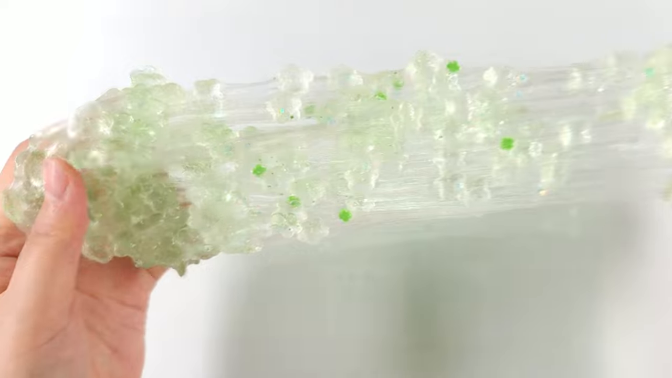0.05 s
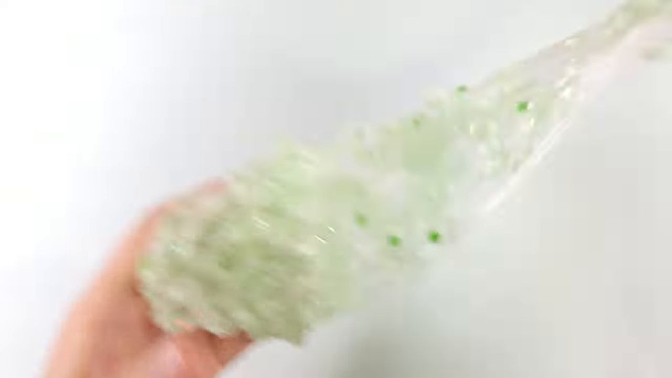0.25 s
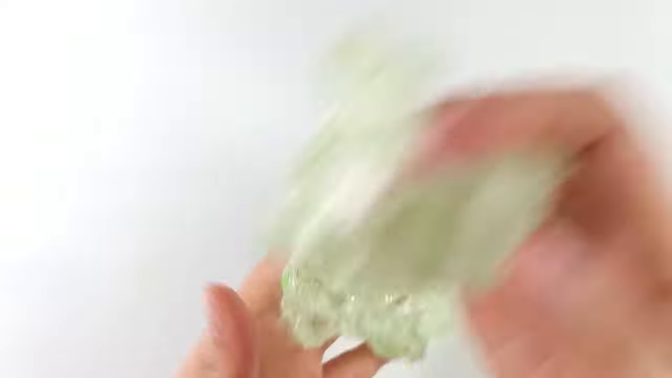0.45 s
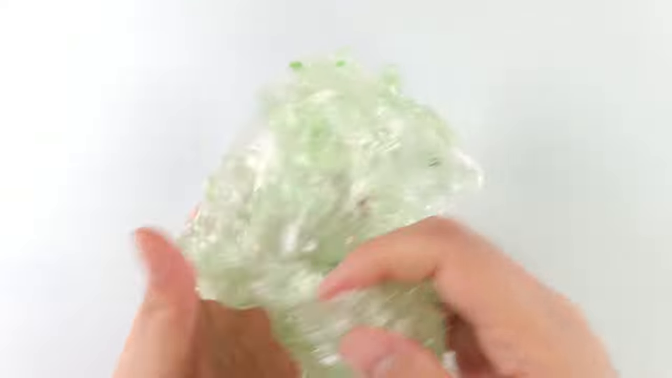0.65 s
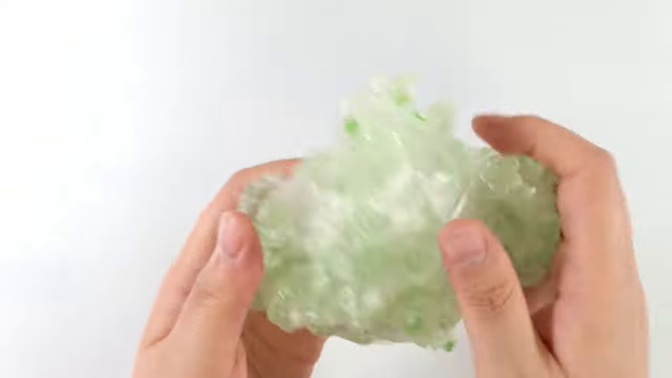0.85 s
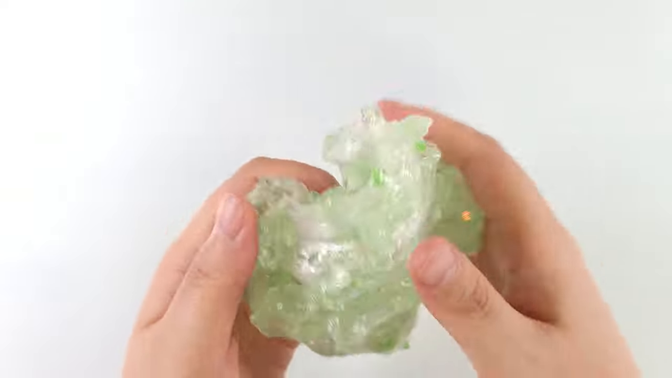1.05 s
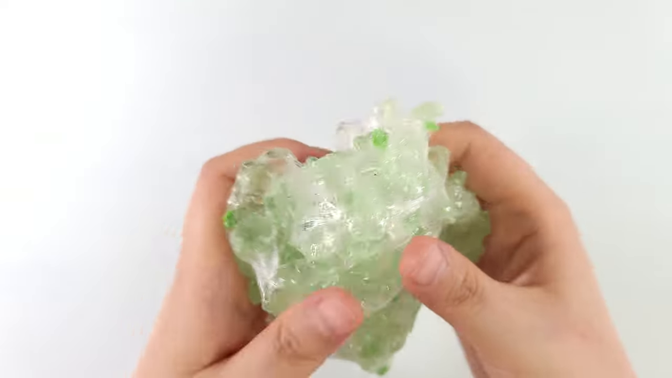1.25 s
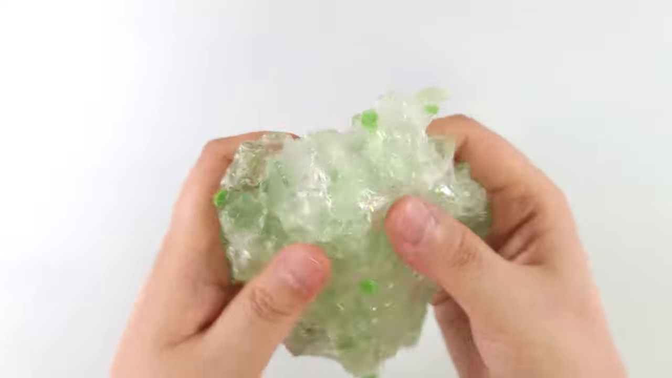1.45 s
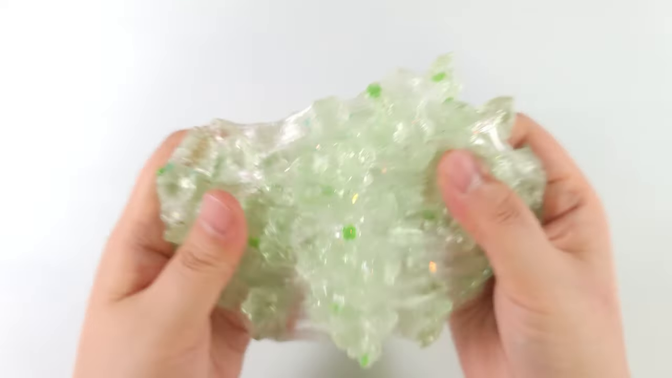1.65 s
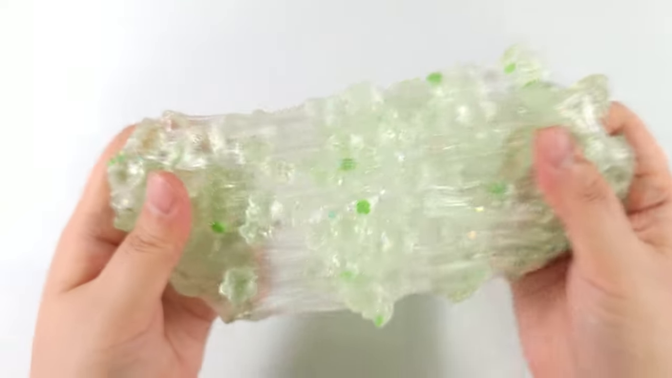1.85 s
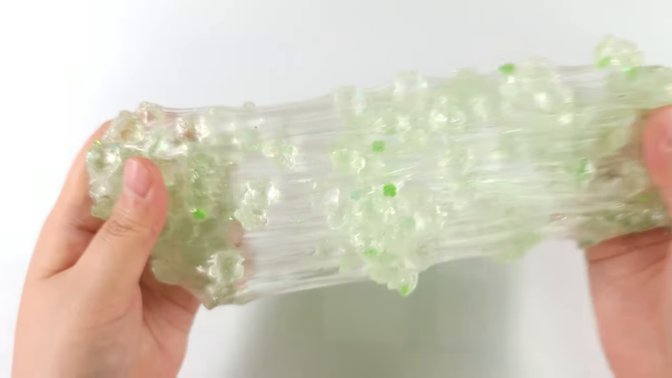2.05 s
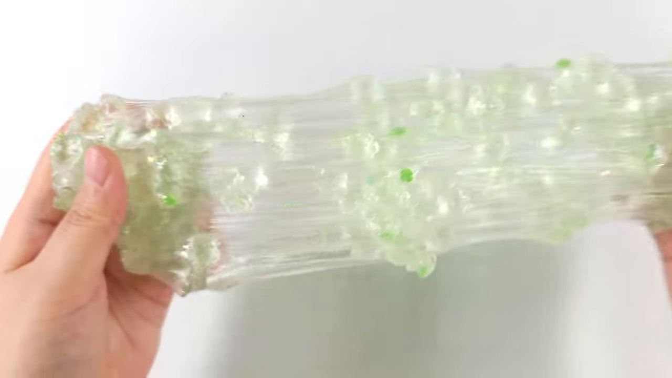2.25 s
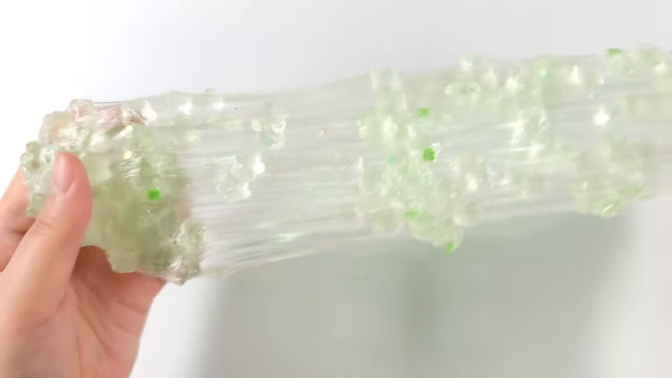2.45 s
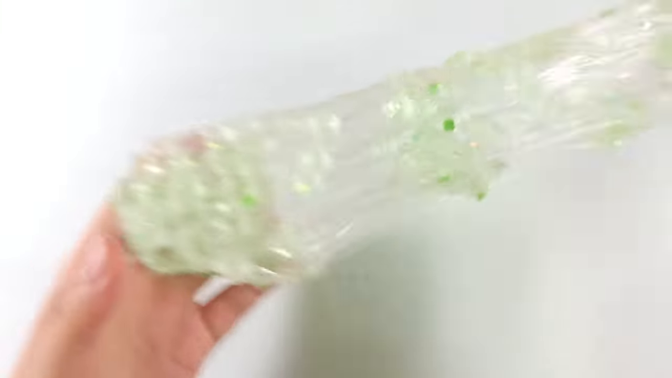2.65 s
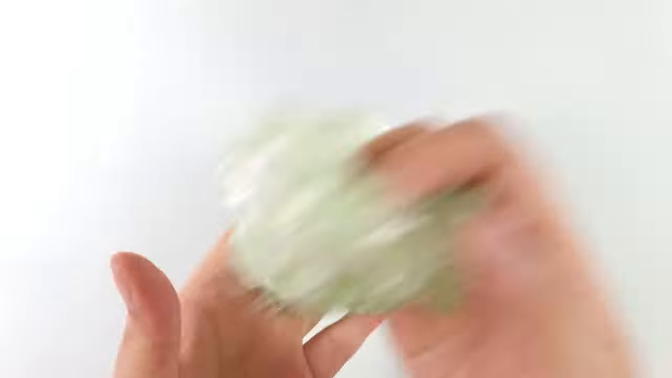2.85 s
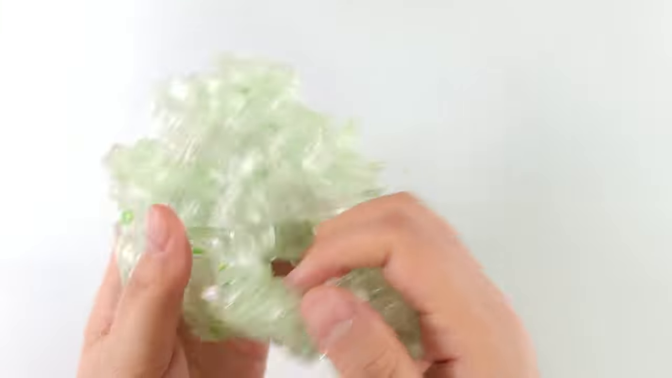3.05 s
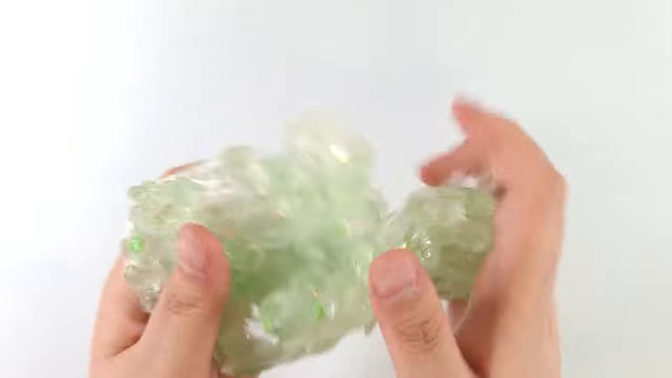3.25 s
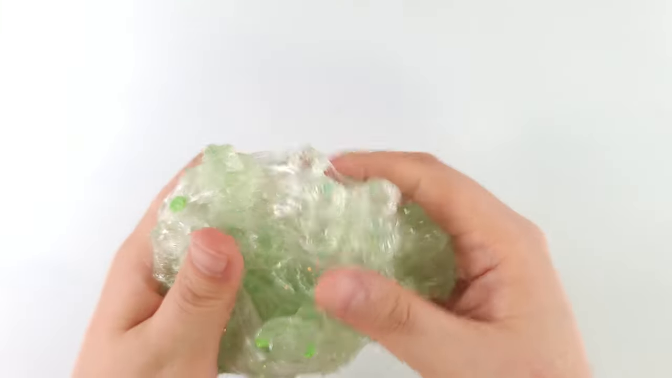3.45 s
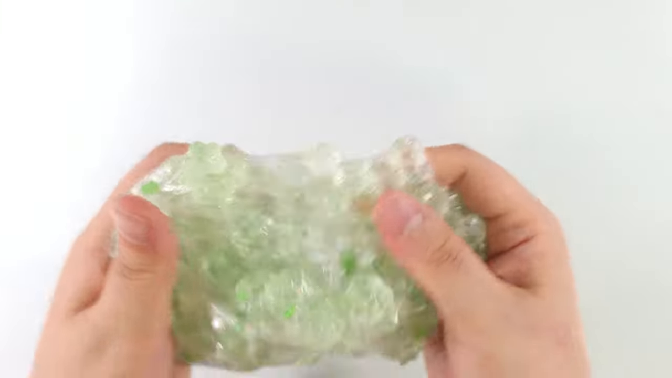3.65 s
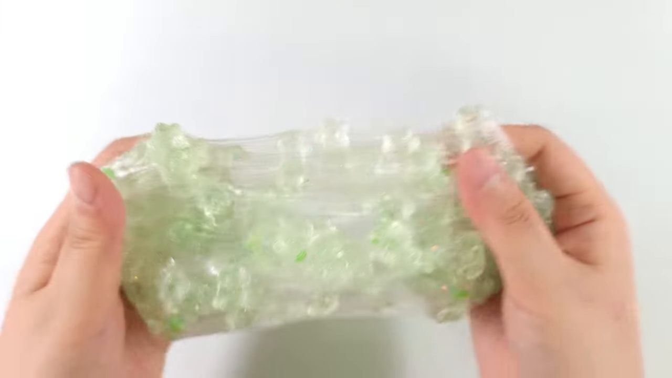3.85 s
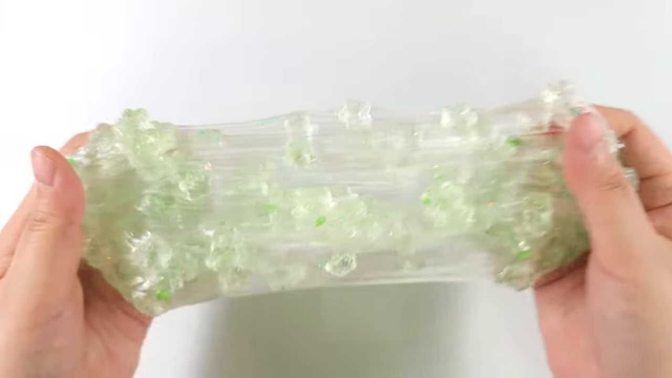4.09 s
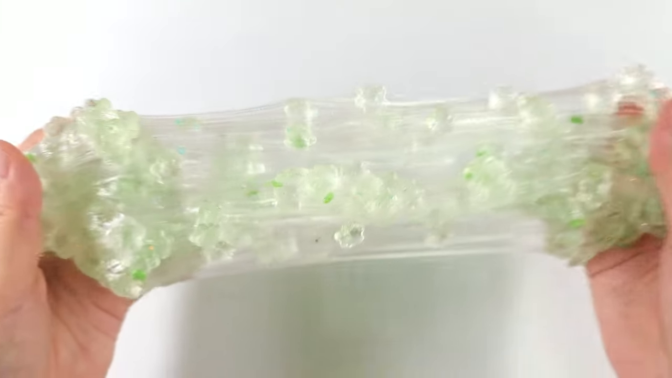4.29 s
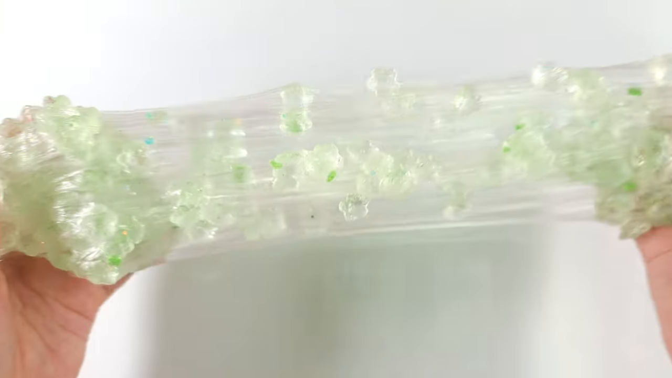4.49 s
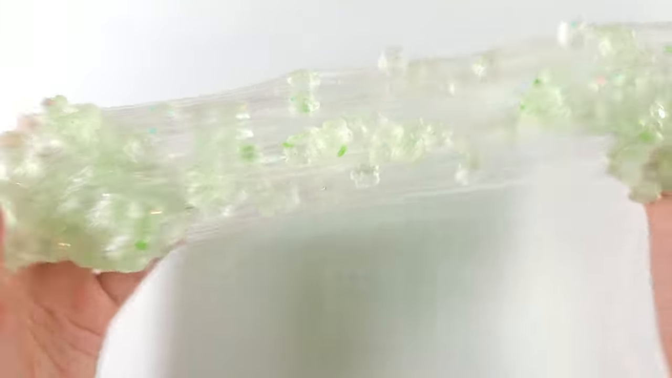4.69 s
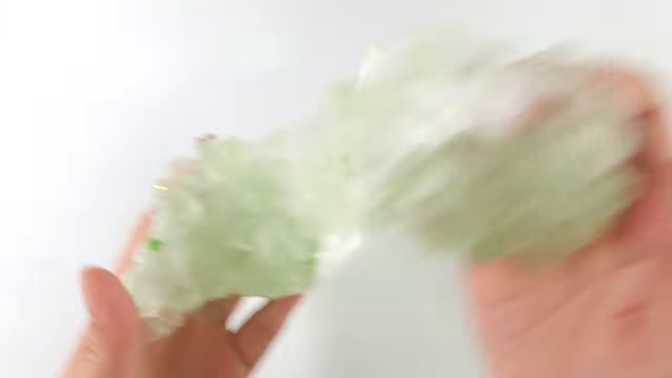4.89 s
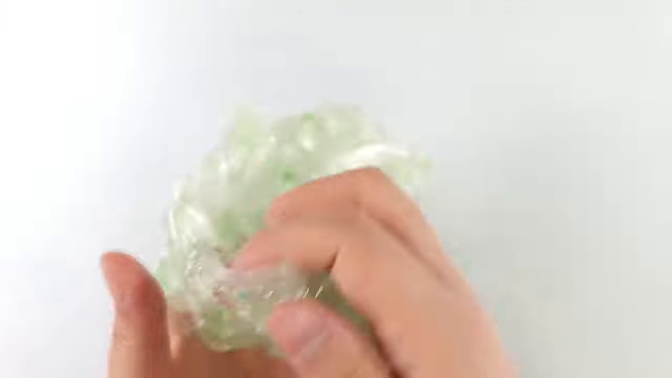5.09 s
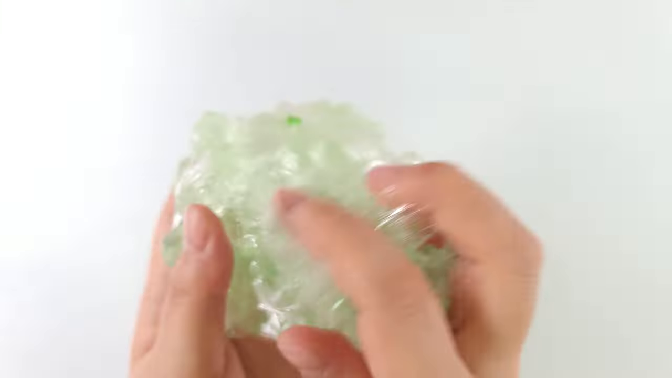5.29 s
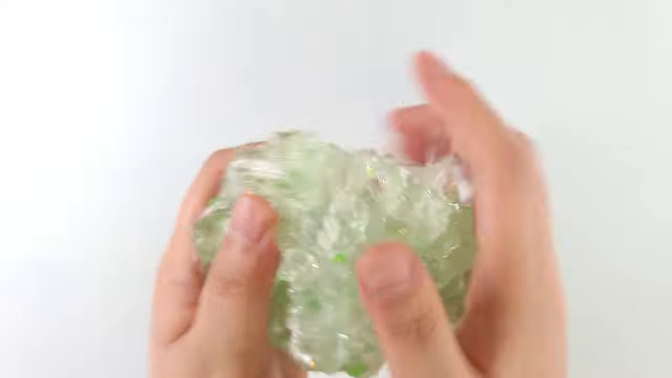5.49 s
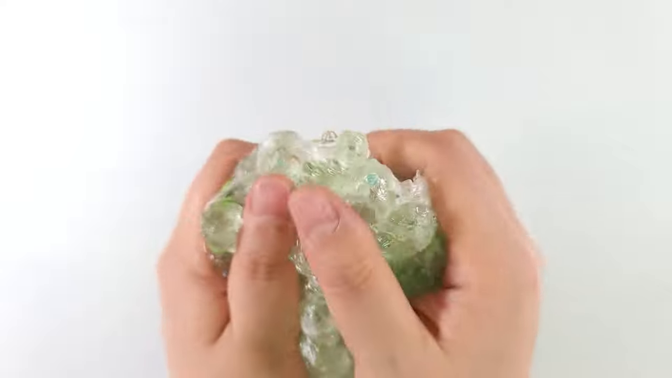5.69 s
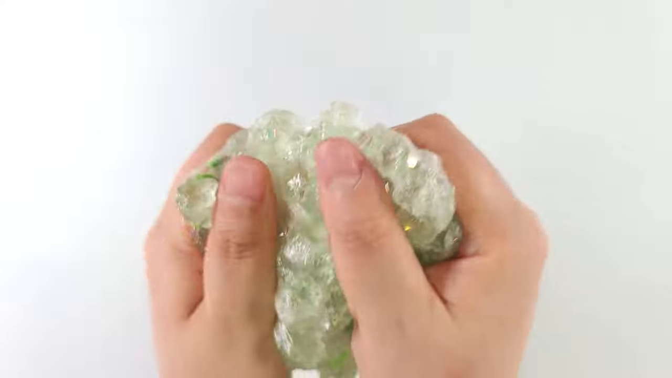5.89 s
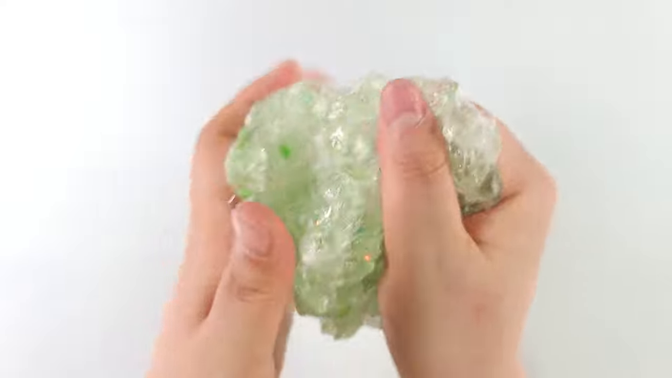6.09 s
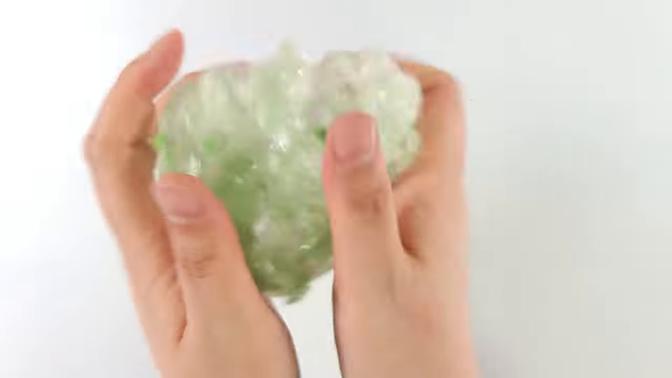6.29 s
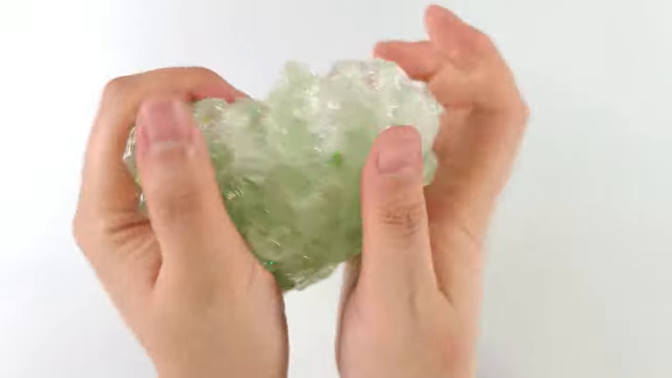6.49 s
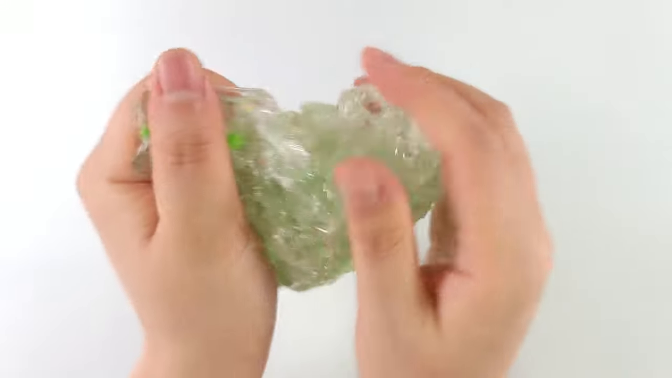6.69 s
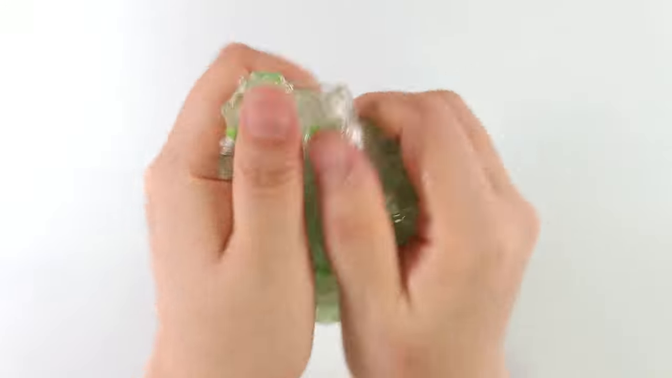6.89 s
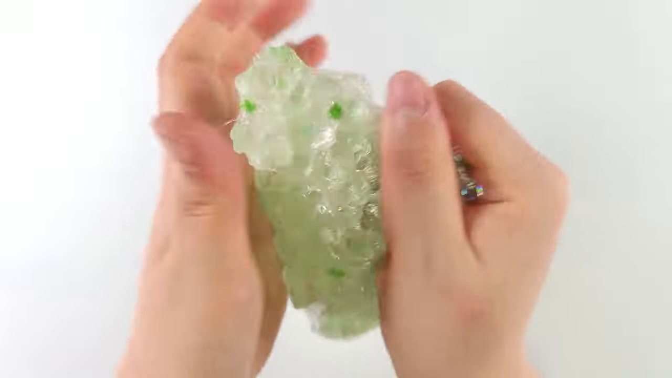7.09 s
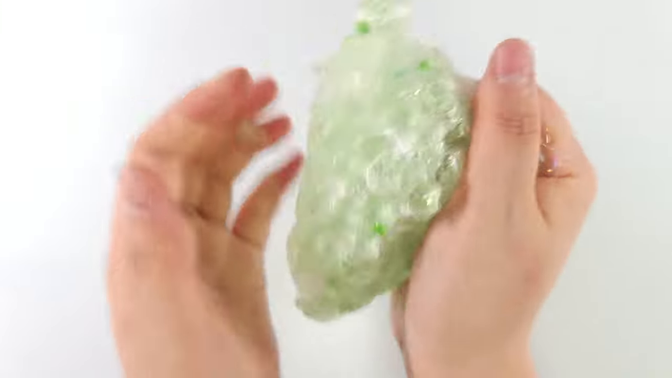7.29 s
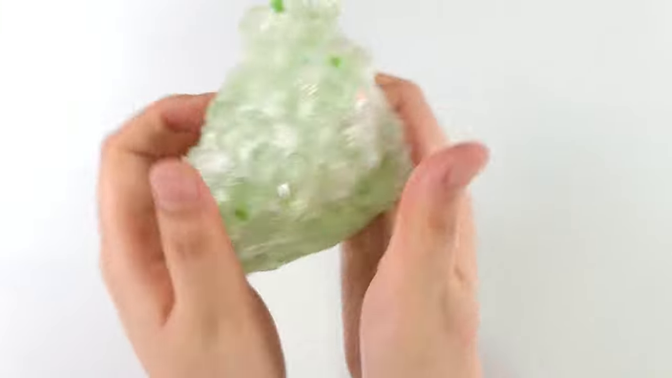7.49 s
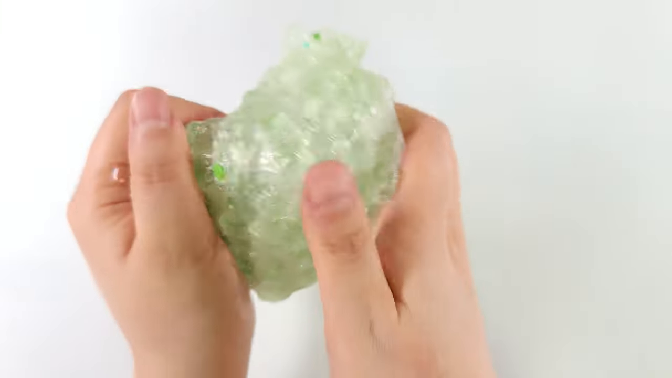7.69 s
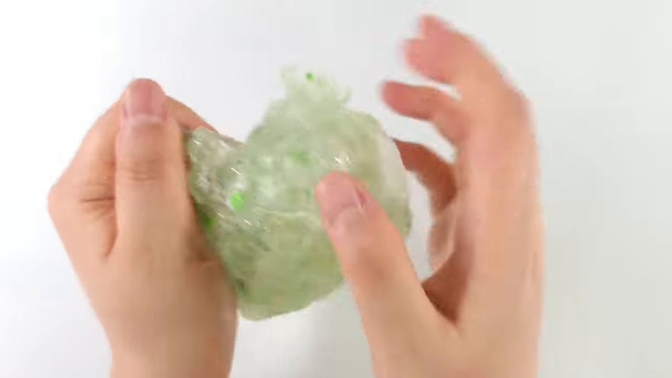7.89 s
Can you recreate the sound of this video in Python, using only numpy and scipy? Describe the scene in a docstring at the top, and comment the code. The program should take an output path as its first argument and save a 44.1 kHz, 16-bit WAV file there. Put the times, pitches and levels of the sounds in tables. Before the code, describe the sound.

Mono close-up of slime full of tiny air pockets being kneaded. Irregular crackles, bright fizz and soft squelch swell and let go with each pull, with scattered small pops. After a sparse, faint stretch and a tiny squirt, a hard squeeze sets off the loudest popping, followed by another snapping cluster near seven seconds. Dull palm rubbing and faint room rumble lie underneath.

```python
"""Hands kneading bubbly slime

Two hands stretch, fold and squeeze a lump of slime close to a mono microphone in a small quiet room.
Each stroke swells, thins out and lets go: random clicks drive resonators that crackle, fizz and squelch.
Popping air pockets and one squirt are short swelling tones with noise; low rising blips are mostly
big pockets collapsing, and one is a hand bump. Filtered noise makes the dull rub of palms and the
room's rumble; a limiter holds the loudest pops."""
import sys
import numpy as np
from scipy import signal
from scipy.fft import rfft, irfft
from scipy.io import wavfile
from scipy.ndimage import uniform_filter1d, minimum_filter1d

SR = 44100
rng = np.random.default_rng(int(sys.argv[2]) if len(sys.argv) > 2 else 0)


def master(y):
    """Save y as 16-bit WAV."""
    cut = np.clip(np.atleast_2d(y).T, -1, 1)
    pcm = np.round(cut * 32767)  # scale
    wavfile.write(sys.argv[1], SR, pcm.astype(np.int16))


N = 350154


def from_db(db):
    """Decibels to gain."""
    return 10 ** (np.asarray(db) / 20)


def rms_one(x):
    """Scale to unit power."""
    return x / np.sqrt(np.mean(x ** 2) + 1e-20)


def at_hz(points, hz):
    """Read a spectrum in dB on a log-frequency axis."""
    points = np.array(points)
    return np.interp(np.log(hz), np.log(points[:, 0]), points[:, 1])


def band(x, low_hz, high_hz, order=2):
    """Causal band-pass."""
    sos = signal.butter(order, [low_hz, high_hz], "band", fs=SR, output="sos")
    return signal.sosfilt(sos, x)


def drift(per_s):
    """Smooth chance with spread 1: random values, so many a second, joined by straight lines."""
    knots = rng.standard_normal(N // 10)
    return rms_one(np.interp(np.arange(N) * per_s / SR, np.arange(len(knots)), knots))


def add(out, s, sound):
    """Mix a sound in at a time in seconds."""
    at = int(np.clip(round(s * SR), 0, N - 1))
    out[at:at + len(sound)] += sound[:N - at]


def working():
    """Drive of crackle, fizz and squelch in dB: strokes swell, sag and let go by one rule and add in power."""
    # Each grip, press or pull of the hands. Each row: time of full force in seconds, swell in seconds,
    # hold in seconds, crackle in dB, fizz over crackle in dB, squelch over crackle in dB (before the trims).
    strokes = [(0.274, 0.12, 0.06, -37.5, -3.5, -15), (0.951, 0.22, 0.049, -47, -2, -16.5),
               (1.083, 0.07, 0.045, -35, 0.5, -21.5), (1.308, 0.046, 0.068, -36, -4.5, -19.5),
               (1.56, 0.018, 0.13, -33, -6, -19.5), (1.751, 0.13, 0.62, -37, -2, -11.5),
               (2.507, 0.007, 0.075, -36.5, -7.5, -13), (2.645, 0.1, 0.6, -51.5, -3, -15),
               (3.083, 0.026, 0.054, -46, -7, -22), (3.287, 0.088, 0.21, -37, -1.5, -15),
               (3.563, 0.0097, 0.0043, -37, -3, -9.5), (3.739, 0.17, 0.25, -36.5, -2, -12.5),
               (4.122, 0.45, 0.08, -43, -3, -7), (4.335, 0.12, 0.016, -53.5, 1.5, -5),
               (4.572, 0.19, 0.0082, -45, 0, -7), (4.861, 0.021, 0.07, -53.5, -6, -32),
               (4.963, 0.11, 0.037, -48.5, -0.5, -18.5), (5.28, 0.11, 0.034, -41, -6, -26),
               (5.408, 0.087, 0.12, -36, -13, -15.5), (5.542, 0.19, 0.033, -29.5, -0.5, -15),
               (5.904, 0.25, .32, -25, -1.5, -11.5), (6.386, 0.11, 0.053, -34, -0.5, -12),
               (6.682, 0.39, 0.2, -35, -2.5, -13), (7.066, 0.082, 0.26, -28, -0.5, -11.5),
               (7.333, .01, 0.0059, -35.5, 9, -7), (7.507, 0.044, 0.34, -37, 0.5, -12),
               (7.783, 0.16, .05, -29.5, -4, -13.5), (7.872, 0.045, .06, -27, -8, -8)]
    # The lump settling between strokes: crackle, fizz and squelch in dB (before the trims).
    rest_db = (-65.5, -64, -90)
    # A held stroke thins out as its cells are used up, and dies when the fingers let go.
    swell_db, sag_db_per_s, release_db_per_s = 20.5, 27.5, 218
    squelch_follows = 0.88   # share of a stroke's swing in dB that the squelch takes part in

    t = np.arange(N) / SR
    power = np.outer(from_db(rest_db) ** 2, np.ones(N))
    for s, swell_s, hold_s, level_db, fizz_db, squelch_db in strokes:
        near = (t > s - 2 * swell_s) & (t < s + hold_s + .25)
        age = t[near] - s
        swell = swell_db * np.minimum(age, 0) / swell_s
        sag = sag_db_per_s * np.clip(age, 0, hold_s)
        release = release_db_per_s * np.maximum(age - hold_s, 0)
        force_db = swell - sag - release
        layers_db = np.array([force_db, fizz_db + force_db, squelch_db + squelch_follows * force_db])
        power[:, near] += from_db(level_db + layers_db) ** 2
    return 10 * np.log10(power)


def tears(per_s, spread_db, clump_db):
    """Cells give way at random and in clumps; most are tiny, a few are large."""
    born = rng.random(N) < per_s * from_db(clump_db * drift(45)) / SR
    size = from_db(spread_db * np.minimum(rng.exponential(1, N), 6.2))
    return rms_one(born * size * rng.choice([-1, 1], N))


def ring(x, hz, cycles):
    """A resonance that loses 60 dB in so many cycles; each click leaves the same energy at any pitch."""
    r = from_db(-60 * hz / (cycles * SR))   # decay per sample
    w = 2 * np.pi * hz / SR
    return signal.lfilter(np.sqrt(1 - r * r) * np.array([1, 0, -1]), [1, -2 * r * np.cos(w), r * r], x + 1e-18)


def steady(x):
    """Unit power, evened out over some hundredths of a second."""
    x = rms_one(x)
    power = uniform_filter1d(uniform_filter1d(x ** 2, size=2600), size=1600)
    return x / np.sqrt(np.abs(power) + 1e-3)


def cells(clicks, spectrum, cycles, spill_db, wander_db=5.0, count=16):
    """Each tear rings its own cell and jolts all others; the favoured size wanders as the fingers move on."""
    dealt = rng.integers(0, count, N)   # which cell each click belongs to
    size = 2 * drift(14)
    rings = 0
    for k, hz in enumerate(np.geomspace(spectrum[0][0], spectrum[-1][0], count)):
        # the spill into the other cells makes each tear a dry click
        share = (dealt == k) + from_db(spill_db) * rng.standard_normal(N)
        favour_db = wander_db * np.cos(2 * np.pi * k / count + size)
        rings = rings + ring(clicks * share * from_db(at_hz(spectrum, hz) + favour_db), hz, cycles)
    return steady(rings)


def slime(crackle_db, fizz_db, squelch_db, crackle_trim_db=2.5, fizz_trim_db=4.5, squelch_trim_db=1.5):
    """Harder work tears more cells; each tear snaps its film, rings its cavity and jolts the fold around it."""
    # How strongly cavities, films and folds of each size ring. Each row: pitch in Hz, relative level in dB.
    cavity_sizes = [(1200, -12), (1800, -1), (2600, 5), (3500, 7), (4900, 10), (6500, -4)]
    film_sizes = [(6800, -1.5), (9200, 12.5), (11500, 8.5), (13500, 5), (15500, -39)]
    fold_sizes = [(260, -9.5), (380, -2), (800, 3), (1200, 2.5)]

    per_s = 2900 * from_db(.38 * (crackle_db + 40))
    clicks = tears(per_s, spread_db=4.5, clump_db=3.8)
    cavities = cells(clicks, cavity_sizes, cycles=16.0, spill_db=-14.5)
    films = cells(clicks, film_sizes, cycles=22.0, spill_db=-14)
    folds = cells(clicks, fold_sizes, cycles=9.0, spill_db=-16)
    crackle = from_db(crackle_db + crackle_trim_db) * band(cavities, 1260, 6070)
    fizz = from_db(fizz_db + fizz_trim_db) * band(films, 5300, 21950)
    squelch = from_db(squelch_db + squelch_trim_db) * band(folds, 240, 1380)
    return crackle + fizz + squelch


def burst(t, hz, rise_cycles, glide=0):
    """A tone that swells to height 1 within a cycle or so and dies away, its pitch rising by the glide."""
    age = t * hz / rise_cycles
    turns = hz * t * (1 + glide * np.tanh(age / 10))
    return age * np.exp(1 - age) * np.sin(2 * np.pi * (turns + rng.random()))


def burst_level(x, level_db):
    """Give a short burst the energy of one millisecond at that level."""
    return x * from_db(level_db) * np.sqrt(SR / 1000 / np.sum(x ** 2))


def scatter(x, near_s=0.0013, near_db=-6.5):
    """The cupped hands throw a burst back within milliseconds, never twice the same way."""
    t = np.arange(len(x)) / SR
    echoes = rng.standard_normal(len(x)) * np.sqrt(t) * np.exp(-t / near_s)
    return x + from_db(near_db) * signal.fftconvolve(x, echoes / np.linalg.norm(echoes))[:len(x)]


def pops_and_squirt(cavity_cycles=0.58, snap_cycles=0.86, snap_hz=10000, neighbour_db=-2.5,
                    shred_db=-18.0, shred_s=0.001, puff_db=-23, puff_growth=0.21):
    """A film snaps and shreds, its cavity rings with a neighbour, air puffs; the squirt is built alike."""
    # Short bursts that stand out of the crackle: popping air pockets, and a squirt at 4.59 s.
    # Each row: start in seconds, cavity pitch in Hz, cavity ring in dB, film snap in dB,
    # both levels over one millisecond.
    short_bursts = [(0.251, 2160, -26.5, -19), (0.2855, 5000, -21.5, -19.5), (0.3094, 2300, -23.5, -12),
                    (0.6416, 4230, -25.5, -23.5), (1.0201, 5080, -30, -28), (1.0487, 5200, -24, -27),
                    (1.078, 4330, -10.5, -6), (1.2394, 3230, -26, -25.5), (1.384, 3270, -16.5, -23.5),
                    (1.5522, 4640, -7.5, -17.5), (1.602, 4550, -22, -25), (1.661, 4730, -19.5, -32),
                    (1.7354, 2020, -20, -40), (1.7662, 3430, -12.5, -7.5), (1.769, 1950, -17.5, -24),
                    (1.9073, 2720, -22, -34), (2.053, 2900, -24, -22.5), (2.0838, 2700, -22, -36),
                    (2.1525, 3360, -33, -39), (2.1975, 3600, -24.5, -35), (2.5096, 3440, -15, -14.5),
                    (2.58, 3340, -20, -37), (2.675, 5300, -25, -24.5), (2.8627, 4840.0, -47, -19),
                    (3.0805, 4800, -23, -12.5), (3.0916, 3650, -20, -25), (3.194, 4140, -28, -26),
                    (3.2652, 4200.0, -40, -17), (3.4118, 3160, -19, -13), (3.4508, 4200, -10, -7.5),
                    (3.7306, 4340, -28, -17), (3.79, 3420, -9.5, -13), (3.828, 2060, -21.5, -37),
                    (4.0303, 5060, -16.5, -27), (4.069, 4220, -20.5, -27), (4.1275, 4070, -20, -19),
                    (4.1458, 5500, -39, -10.5), (4.3421, 4350, -30, -32), (4.455, 3380, -32, -42),
                    (4.5133, 4450, -19, -25.5), (4.5899, 3120, -21, -14), (4.633, 4600, -26, -49),
                    (4.679, 4570, -33.5, -38.5), (4.8631, 3830, -31, -39), (5.0551, 5200, -31.5, -33.5),
                    (5.2514, 2470, -24, -24), (5.295, 2130, -19.5, -24), (5.382, 3650, -21.5, -19.5),
                    (5.405, 3170, -16, -1), (5.43, 5160, -11.5, -5), (5.4434, 2500, -16, -32),
                    (5.4862, 2700, -13, -35), (5.5118, 4600, -13, -18), (5.5421, 2900, -19, -17),
                    (5.6888, 2660, -24.5, -17.5), (5.741, 4550, -14.5, -16), (5.7499, 3900, -16, -30),
                    (5.776, 3550, -15.5, -16), (5.8294, 3240, 5, -5.5), (5.8772, 5070, -10.5, -15),
                    (5.8968, 5440.0, -30, -2.5), (5.904, 4700, -5, -12), (5.91, 2770, -8, -12),
                    (5.9304, 4840, -7, -14), (5.9466, 3300, -7.5, -8.5), (5.9684, 4140, -7, -31),
                    (5.9817, 3720, -4.5, 0), (5.994, 4870, -7.5, -9), (6.0166, 2420, -13.5, -7),
                    (6.034, 4020, -8, -1.5), (6.1012, 5050, -10, -1.5), (6.5389, 3800, -26.5, -23),
                    (6.6095, 3900, -16.5, -43), (6.699, 4000, -11.9, -14), (6.7157, 4400, -9.5, -14.5),
                    (6.7243, 4500, -18, -18), (6.79, 4220, -29, -14), (6.8243, 3140, -34, -16),
                    (6.8392, 3720, -32, -17), (6.855, 3900, -17, -42), (6.9027, 4540, -23.5, -28),
                    (6.9756, 4050, -37, -16.5), (7.021, 4040, -16, -19), (7.055, 4070.0, -46, -7),
                    (7.07, 4060, -10, -17.2), (7.0791, 3250, -8, -14), (7.0917, 3510, -27, -9),
                    (7.108, 3160.0, -27, -10), (7.1248, 4110.0, -29, -6), (7.1322, 4840, -8, -9),
                    (7.1418, 3000, -8.5, -16), (7.163, 4330, -12.5, -7), (7.1947, 4900, -13.5, -2),
                    (7.212, 3480, -17.5, -12), (7.219, 3420, -27, -2), (7.2323, 3070, -10, 0),
                    (7.2482, 4600, -10.5, -0.5), (7.333, 5000, -26, -7.5), (7.415, 3560, -29, -18),
                    (7.494, 4450, -17, -18), (7.6412, 5400, -16, -18), (7.709, 4900, -20.5, -17.5),
                    (7.7586, 2900, -14.5, -39), (7.8741, 3100, -7.5, -16), (7.8803, 3520, -7.5, -10),
                    (7.9116, 4500, -14, -17)]

    out, t = np.zeros(N), np.arange(SR // 50) / SR
    puff = band(t == 0, 400, 2100)
    for s, hz, ring_db, snap_db in short_bursts:
        shreds = from_db(shred_db) * rng.standard_normal(len(t)) * np.exp(-t / shred_s)
        # a burst that opens softly, with little snap, rings longer
        cycles = cavity_cycles * np.clip(1 + (ring_db - snap_db) / 20, 1, 2)
        neighbour_hz = hz * 2 ** rng.uniform(-.55, .55)
        neighbour = from_db(neighbour_db) * burst(t, neighbour_hz, cycles)
        cavity = band(burst(t, hz, cycles, glide=0.045) + neighbour + shreds, .5 * hz, 7800, order=3)
        film = burst(t, snap_hz * np.exp(rng.normal() / 20), snap_cycles)
        snap = band(film + shreds, 6370, 15000)
        # the louder the ring, the larger the share of air
        air = burst_level(puff, puff_db + ring_db + puff_growth * (ring_db + 9))
        add(out, s, burst_level(scatter(cavity), ring_db) + burst_level(scatter(snap), snap_db) + air)
    return out


def low_blips(rise_cycles=0.43, glide=0.36):
    """Low, short tones that rise in pitch, as from a large hollow; the hand bump is built alike."""
    # Low rising blips: mostly big pockets collapsing; the one at 7.337 s is a hand bump.
    # Each row: start in seconds, base pitch in Hz, height in dB (ahead of the band-pass).
    blips = [(1.384, 735, -32), (2.567, 220, -32), (2.572, 440, -30), (5.908, 646, -14.5),
             (5.932, 620, -10), (6.215, 830, -24), (7.337, 130, -46)]

    out, t = np.zeros(N), np.arange(SR // 10) / SR
    for s, hz, level_db in blips:
        blip = band(burst(t, hz, rise_cycles, glide), 0.26 * hz, 10 * hz)
        add(out, s, from_db(level_db) * blip)
    return out


def hands(squelch_db, level_db=-52.5, follow=0.19, lumpy_db=3.0, bump_s=0.032):
    """Palms and fingers rub dull and uneven on the lump, stronger as folds are pressed, with bumps."""
    # The lump knocks against a palm as the grip changes.
    # Each row: time of the peak in seconds, level in dB (ahead of the lumpiness).
    knocks = [(0.29, -51.5), (2.56, -61), (3.05, -52.5), (3.38, -52), (3.74, -50.5), (6.15, -49),
              (7.1, -56), (7.33, -50)]

    t = np.arange(N) / SR
    rub = rms_one(band(band(rng.standard_normal(N), 38, 400), 46, 126, order=1))
    bumps = sum(from_db(db) / (1 + ((t - s) / bump_s) ** 2) for s, db in knocks)
    pressure = from_db(level_db + follow * squelch_db)
    return np.hypot(pressure, bumps) * from_db(lumpy_db * drift(25)) * rub


def room(x, t60_s=.36, tail_db=-17.5, table_s=.0027, table_db=-17):
    """The table top gives one early echo; the walls add a faint smooth tail."""
    t = np.arange(SR // 2) / SR
    noise = band(rng.standard_normal(len(t)), 230, 20700, order=1)
    tail = noise * from_db(-60 * t / t60_s) * (t > table_s)
    echo = from_db(tail_db) * tail / np.linalg.norm(tail)
    add(echo, table_s, from_db([table_db]))
    return x + signal.fftconvolve(x, echo)[:N]


def background(level_db=-63.5):
    """Low steady rumble of the room under a thin hiss, made of coloured noise."""
    # Spectrum of the quiet room. Each row: frequency in Hz, relative density in dB per Hz.
    floor_points = [(22, -23), (42, 2.5), (245, -12.5), (319, -17), (1130, -12), (2900, -11.5), (6380, -11),
                    (8980, -12), (16000, -17)]

    hz = np.maximum(np.fft.rfftfreq(N, 1 / SR), 1)
    # below the first point the noise fades out
    colour = from_db(at_hz(floor_points, hz)) * np.minimum(hz / floor_points[0][0], 1) ** 2
    return from_db(level_db) * rms_one(irfft(rfft(rng.standard_normal(N)) * colour, N))


def scene():
    """Strokes drive the slime and the rub, bursts and blips have their own times; both channels are alike."""
    crackle_db, fizz_db, squelch_db = working()
    close = pops_and_squirt() + low_blips() + slime(crackle_db, fizz_db, squelch_db)
    mono = room(close) + hands(squelch_db) + background()
    return np.array([mono, mono])


def record(dry):
    """An instant limiter holds the sharpest pops at full scale; the highest treble is cut."""
    gain = 1 / np.maximum(np.abs(dry), 1)
    gain = uniform_filter1d(minimum_filter1d(gain, size=9), size=9)
    cut = signal.ellip(10, .1, 80, 16100, fs=SR, output="sos")   # low-pass at 16100 Hz
    return signal.sosfilt(cut, dry * gain)


dry = scene()
out = record(dry)
master(out)
```